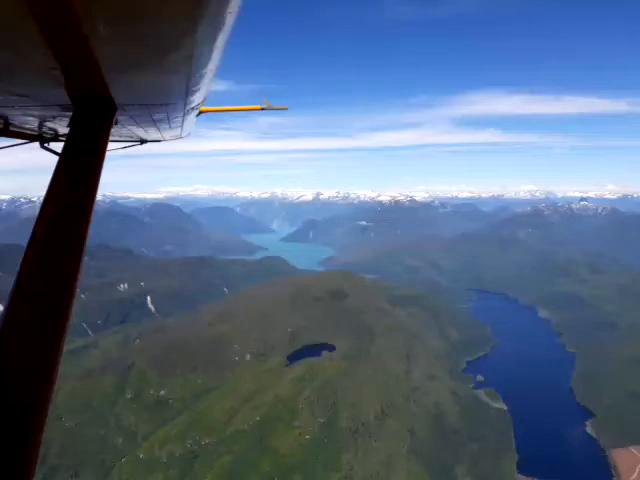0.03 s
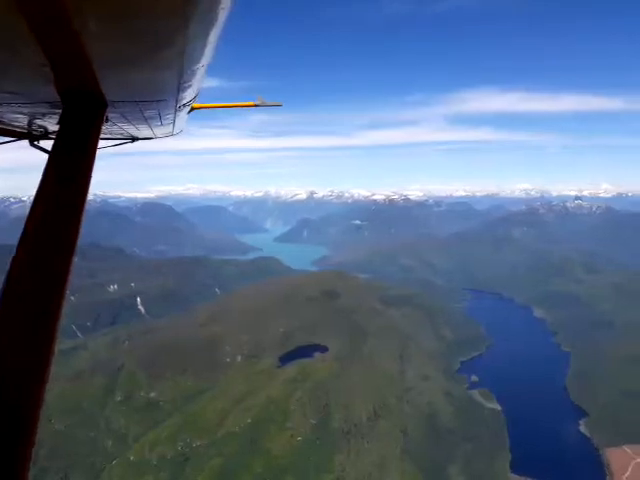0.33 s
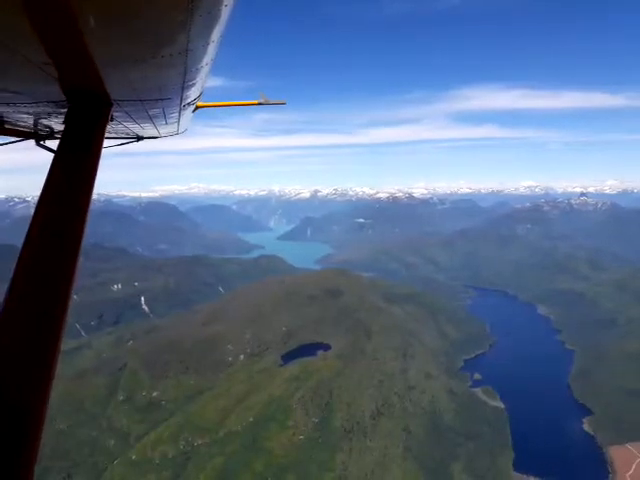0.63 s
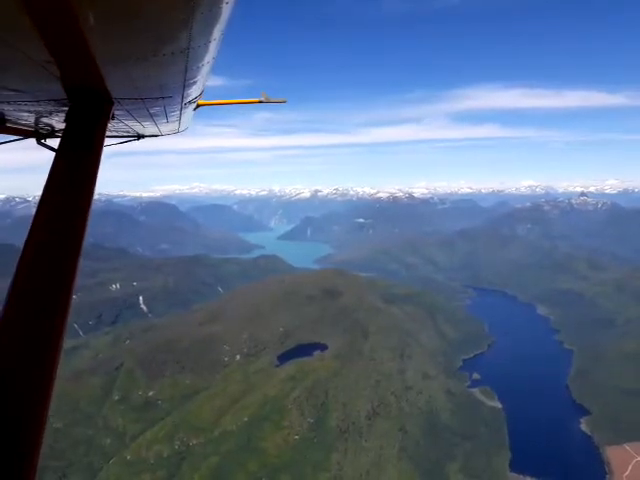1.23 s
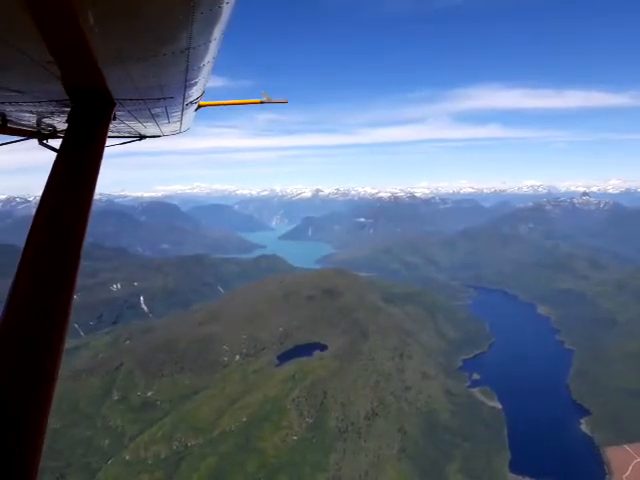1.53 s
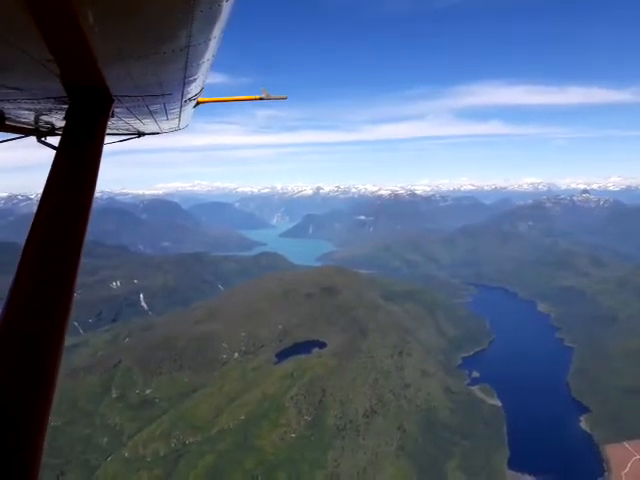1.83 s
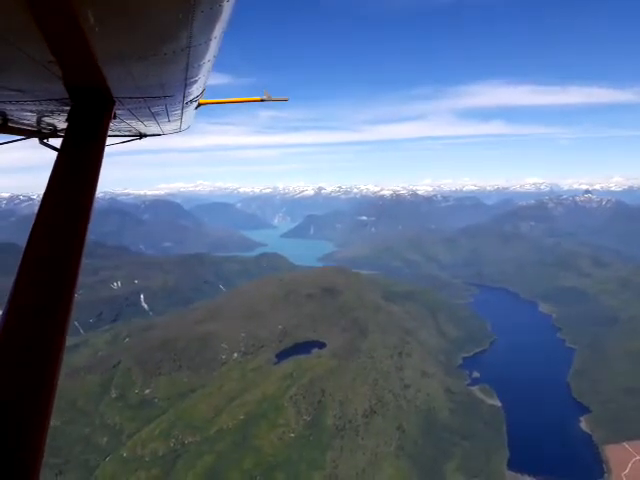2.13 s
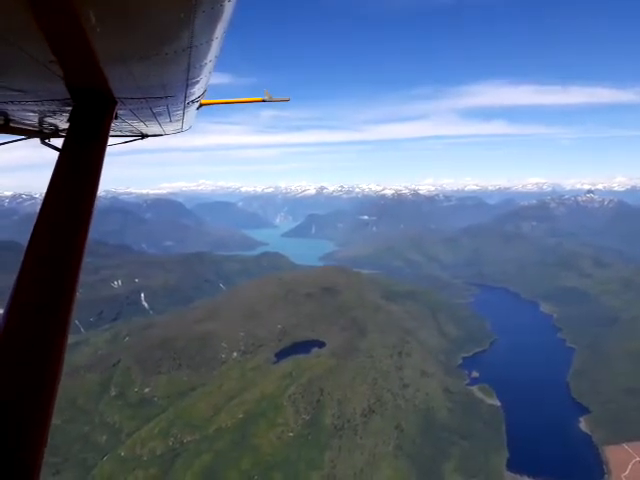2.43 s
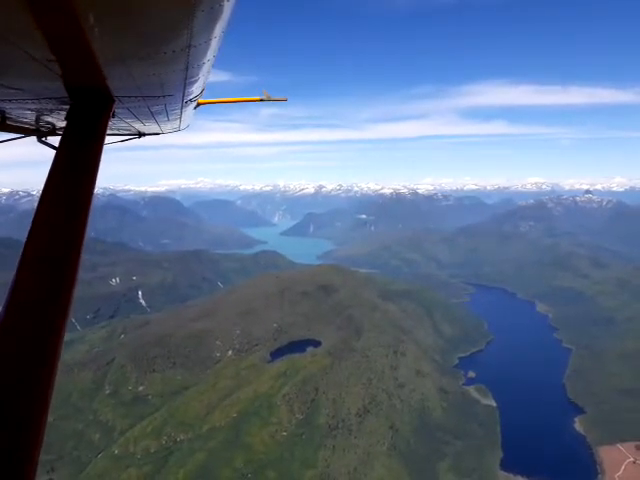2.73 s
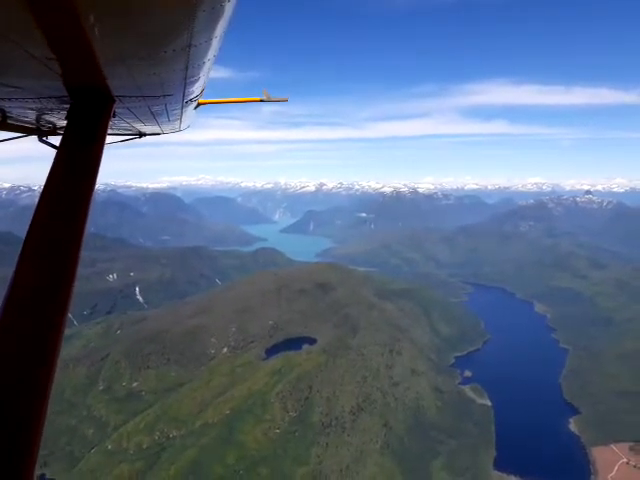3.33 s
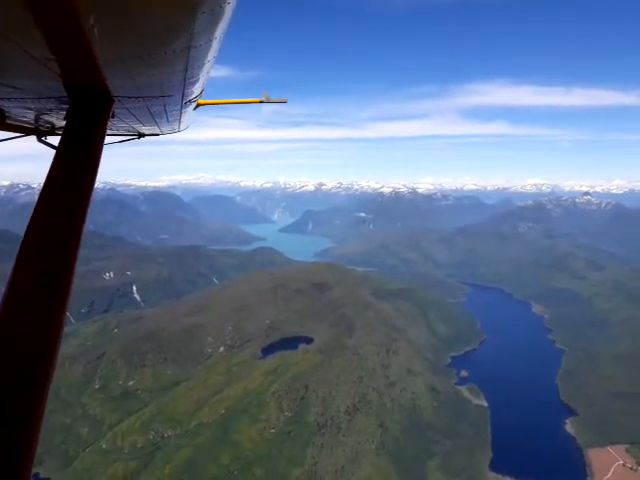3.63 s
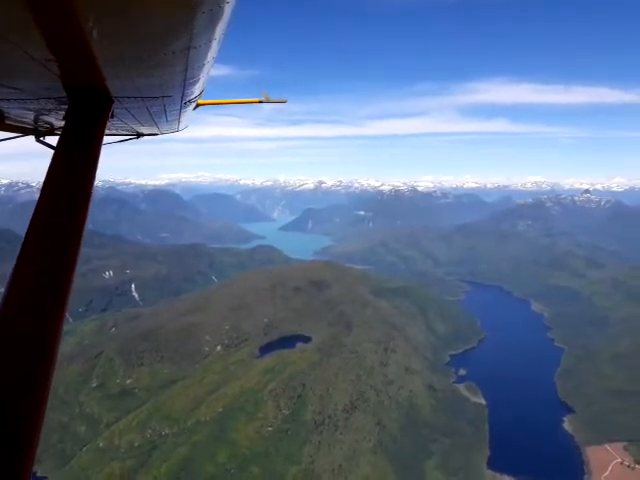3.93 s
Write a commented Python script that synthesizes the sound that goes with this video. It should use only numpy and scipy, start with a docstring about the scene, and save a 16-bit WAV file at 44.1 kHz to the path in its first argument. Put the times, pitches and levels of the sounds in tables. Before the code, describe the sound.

A small propeller plane's engine drone fades in at about 0.4 seconds, after silence, and is fully loud by 0.7 seconds. Heard inside the cabin, it holds a low, booming pitch with a slight warble until the end at about 4 seconds. Air rushes steadily past underneath. Throughout, the din overloads the microphone, making a fluttering crackle of irregular snaps and ticks, mostly on the left.

```python
"""A piston engine's drone fades in, heard inside a small propeller aircraft in level flight.
Its eleventh order booms in the cabin while the slipstream rushes past.
The din overloads the camera, whose signal flips to the opposite rail at the crests:
a fluttering crackle of snaps and ticks, mostly on the left."""
import sys
import numpy as np
from scipy.fft import rfft, irfft, next_fast_len
from scipy.io import wavfile
from scipy.ndimage import map_coordinates

SR = 44100
rng = np.random.default_rng(int(sys.argv[2]) if len(sys.argv) > 2 else 0)


def put_to_file(sound):
    """Save the sound as 16-bit audio at rate SR, in the file named by the first command-line argument."""
    columns = np.atleast_2d(sound).T  # one column per channel
    safe = np.clip(columns, -1, 1)
    whole_steps = np.round(safe * 32767)
    wavfile.write(sys.argv[1], SR, whole_steps.astype(np.int16))


N = 176400

CYCLE_HZ = 15.4607  # one engine cycle = two revolutions
RAIL = 0.86  # overload limit, linear


def engine():
    """Orders of a steady engine; the airframe delays the higher ones, smearing each cycle into a warble."""
    # engine orders: (multiple of the cycle rate, level [dB])
    orders = [(4, -40), (5, -36.5), (6, -32), (7, -28), (8, -32.5), (9, -22.5), (10, -23.5), (11, -10),
              (12, -20), (13, -37.5), (14, -36), (15, -33), (16, -39), (17, -35.5), (18, -27.5),
              (20, -35.5), (22, -32.5), (23, -37.5), (24, -42), (25, -28), (26, -46.5), (30, -33.5),
              (32, -40), (33, -37), (35, -47.5), (36, -35.5), (38, -49.5)]
    sag_hz_per_s, cycle_start_s, smear_rad = .00471, .0423, 1.33
    level_db, pan_db, flutter_db, flutter_hz = -0.5, 0.74, 1, 7.2
    t = np.arange(N) / SR
    phase = 2 * np.pi * (CYCLE_HZ * (t - cycle_start_s) - sag_hz_per_s * t ** 2 / 2)
    drone = np.zeros(N)
    for order, db in orders:
        gain = amp(db + flutter_db * wobble(flutter_hz))
        drone += gain * np.cos(order * phase + smear_rad * order ** 2)
    return np.sqrt(2) * drone * amp(level_db + pan_db * np.array([[1], [-1]]))


def snaps(x):
    """Strong overloads: a crest surges and flips to the opposite rail, chattering on the left."""
    # overloads: (time [s], nominal flipped time left [ms], same right [ms], flips on the left)
    overloads = [(0.445, 0.1, 0.027, 3), (0.448, 0.13, 0, 1), (0.515, 0.41, 0.023, 2),
                 (0.518, 0.073, 0.0, 2), (0.604, 0.23, 0.01, 5), (0.639, 0.35, 0.0, 2),
                 (0.646, 0.36, 0.0, 1), (0.677, 0.13, 0.0, 2), (0.76, 0.18, 0.031, 2),
                 (0.768, 0.27, 0.02, 1), (0.797, 0.27, 0.0, 3), (0.832, 0.17, 0.0, 4),
                 (0.838, 0.28, 0.026, 1), (0.895, 0.25, 0.0, 2), (0.897, 0.35, 0.0, 3),
                 (0.902, 0.36, 0.036, 4), (0.963, 0.53, 0.0, 1), (1.019, 0.42, 0.058, 4),
                 (1.028, 0.094, 0.0, 3), (1.074, 0.24, 0.0, 1), (1.098, 0.099, 0.0, 4),
                 (1.156, 0.56, 0.01, 2), (1.259, 0.13, 0.04, 3), (1.262, 0.16, 0.0, 4),
                 (1.287, 0.53, 0.057, 3), (1.29, 0.35, 0.18, 2), (1.356, 0.39, 0.02, 2),
                 (1.415, 0.13, 0.017, 5), (1.42, 0.38, 0.027, 3), (1.437, 0.23, 0.0, 1),
                 (1.485, 0.31, 0.0092, 6), (1.52, 0.37, 0.0, 3), (1.544, 0.1, 0.0068, 2),
                 (1.55, 0.23, 0, 1), (1.609, 0.21, 0.062, 2), (1.612, 0.09, 0.0, 3),
                 (1.675, 0.36, 0.012, 1), (1.678, 0.52, 0.0, 3), (1.715, 0.63, 0.11, 1),
                 (1.732, 0.09, 0.044, 2), (1.738, 0.23, 0.035, 2), (1.744, 0.17, 0.0, 3),
                 (1.803, 0.55, 0.012, 1), (1.832, 0.31, 0.012, 4), (1.845, 0.18, 0.0, 5),
                 (1.868, 0.4, 0.0, 2), (1.873, 0.18, 0.0, 1), (1.934, 0.9, 0.8, 3), (1.939, 0.39, 0.02, 3),
                 (1.98, 0.16, 0.0, 1), (2.06, 0.56, 0.0, 4), (2.103, 0.11, 0.0, 1), (2.128, 0.35, 0.045, 4),
                 (2.197, 0.28, 0.0, 1), (2.256, 0.48, 0.0, 4), (2.35, 0.48, 0.0, 3), (2.386, 0.32, 0.17, 5),
                 (2.392, 0.17, 0.015, 1), (2.427, 0.14, 0.0, 1), (2.45, 0.64, 0.28, 1),
                 (2.494, 0.52, 0.0, 1), (2.511, 0.16, 0.07, 2), (2.519, 0.28, 0.0, 2),
                 (2.539, 0.13, 0.0, 2), (2.578, 0.22, 0.0, 2), (2.583, 0.19, 0.0, 3),
                 (2.683, 0.41, 0.061, 5), (2.686, 0.2, 0.0, 2), (2.752, 0.18, 0.0, 1),
                 (2.773, 0.41, 0.0, 3), (2.868, 0.2, 0.014, 1), (2.902, 0.16, 0.0062, 1),
                 (2.944, 0.1, 0.003, 2), (2.965, 0.29, 0.03, 1), (2.968, 0.21, 0.0, 3),
                 (2.974, 0.61, 0.35, 3), (3.033, 0.21, 0.0, 1), (3.037, 0.058, 0.059, 3),
                 (3.139, 0.13, 0.02, 4), (3.224, 0.25, 0.021, 3), (3.227, 0.24, 0.012, 4),
                 (3.237, 0.18, 0.0, 1), (3.292, 0.39, 0, 2), (3.321, 0.29, 0.0, 3),
                 (3.324, 0.13, 0.0088, 4), (3.359, 0.27, 0.0, 1), (3.363, 0.2, 0.0, 1),
                 (3.421, 0.54, 0.0, 3), (3.428, 0.5, 0.017, 2), (3.515, 0.2, 0.01, 1),
                 (3.551, 0.24, 0.0, 1), (3.561, 0.28, 0.017, 4), (3.574, 0.34, 0.0, 5),
                 (3.623, 0.71, 0.23, 1), (3.675, 0.088, 0.05, 2), (3.746, 0.74, 0.0, 2),
                 (3.783, 0.2, 0.029, 2), (3.816, 0.62, 0.22, 4), (3.853, 0.49, 0.0, 3),
                 (3.874, 0.6, 0.37, 3), (3.907, 0.13, 0.0, 1), (3.936, 0.12, 0.0, 1), (3.938, 0.19, 0.0, 5),
                 (3.981, 0.15, 0.0, 1)]
    surge_share, surge_s = .7, .0009  # share of the way to the rail, half-width
    pause_s, hold_ms = .0001, 0.18
    reach = int(.0008 * SR)
    y = x.copy()
    for time_s, left_ms, right_ms, count in overloads:
        scatter = rng.standard_normal((2, 8))
        first = int(time_s * SR) - reach
        crest = first + np.argmax(np.abs(x[0, first:first + 2 * reach]))
        rail = np.sign(x[0, crest]) * RAIL
        gap_s = pause_s / (1 + (right_ms / hold_ms) ** 2)  # long holds merge into one knock
        gates = flip_burst(left_ms, count, gap_s, scatter), flip_burst(right_ms, 1, gap_s, scatter)
        offsets = np.arange(len(gates[0])) - len(gates[0]) // 2
        at = np.clip(crest + offsets, 0, N - 1)
        surge = surge_share * (rail - x[0, crest]) * np.exp(-(offsets / SR / surge_s) ** 2)
        for side, gate in zip(y, gates):
            side[at] = (side[at] + surge * gate.max()) * (1 - gate) - rail * gate
    return y


def flip_burst(nominal_ms, count, gap_s, scatter):
    """Share (0-1) of each sample spent flipped: count uneven flips with short pauses between."""
    stretch, length_spread, gap_spread = 1.08, 1.35, 1.05
    weights = np.exp(length_spread * scatter[0, :count])
    lengths = stretch * nominal_ms * SR / 1000 * weights / weights.sum()
    gaps = gap_s * SR * np.exp(gap_spread * np.clip(scatter[1, :count], -2, 2))
    ends = np.cumsum(lengths + gaps)
    ends -= (ends[-1] + ends[0] - lengths[0]) / 2  # centre on the crest
    offsets = np.arange(-SR // 400, SR // 400)[:, None]
    overlap = np.minimum(offsets + 1, ends) - np.maximum(offsets, ends - lengths)
    return np.clip(overlap, 0, 1).sum(1)


def ticks(x, per_s):
    """Brief partial flips, in clumps, likelier on wide swings of the wave and once a revolution."""
    clump_db, clump_hz, swing_db, peak_s = 7, 200, 6.5, .022
    flip_share, spread, tick_s = 0.49, 0.34, .00005
    swing = np.cos(4 * np.pi * CYCLE_HZ * (np.arange(N) / SR - peak_s))
    chance = x ** 2 * amp(clump_db * wobble(clump_hz) + swing_db * swing)
    struck = rng.random(N) < per_s / SR * chance / chance.mean()
    depth = flip_share * np.exp(spread * rng.standard_normal(N))
    pulse = np.ones(round(tick_s * SR))
    gate = np.clip(np.convolve(struck * depth, pulse, "same"), 0, 1)
    return x * (1 - gate) - np.sign(x) * RAIL * gate


def slipstream():
    """Air rushing along the cabin: shared in the bass, separate and brighter on the left in the treble."""
    # air noise spectrum per side: (frequency [Hz], density [dB per Hz])
    air_left = [(20, -64), (60, -52), (170, -42), (300, -49), (540, -48), (1000, -55), (1700, -58.5),
                (3000, -66), (4600, -72), (7400, -66.5), (8200, -78), (15500, -79.5)]
    air_right = [(20, -74), (60, -49.5), (170, -45), (300, -51), (540, -53), (1000, -61.5), (1900, -61.5),
                 (3000, -68.5), (4600, -72.5), (7400, -78.5), (8200, -77.5), (15500, -86)]
    # left-right likeness: (frequency [Hz], correlation)
    likeness = [(30, 1), (170, .92), (600, .8), (1000, -0.18), (1400, -0.27), (2000, -.1), (4000, 0.073)]
    level_db, flutter_db, flutter_hz = 0.5, 1.2, 25

    def mid_side_gains(hz):
        angle = np.arccos(along(likeness, hz)) / 2
        return np.array([np.cos(angle), np.sin(angle)])

    mid, side = filtered(rng.standard_normal((2, N)), mid_side_gains)
    stereo = np.array([mid + side, mid - side])
    air = filtered(stereo, lambda hz: amp([along(air_left, hz), along(air_right, hz)]))
    return np.sqrt(SR / 2) * air * amp(level_db + flutter_db * wobble(flutter_hz))


def amp(db):
    """Decibels to gain."""
    return 10 ** (np.asarray(db) / 20)


def along(points, hz):
    """Interpolate (Hz, value) points on a log frequency axis."""
    point_hz, values = np.transpose(points)
    return np.interp(np.log(hz + 1), np.log(point_hz + 1), values)


def wobble(rate_hz):
    """Smooth random curve, rate_hz knots a second."""
    knots = rng.standard_normal(int(N * rate_hz / SR) + 4)
    return map_coordinates(knots, [np.arange(N) * rate_hz / SR])


def filtered(x, response):
    """Filter x by the gain response(hz)."""
    size = next_fast_len(N + SR // 2)
    return irfft(rfft(x, size) * response(np.fft.rfftfreq(size, 1 / SR)), size)[..., :N]


def scene():
    """Engine and airflow in the cabin."""
    return engine() + slipstream()


def record(dry):
    """Overload, band limit and fade-in."""
    fade_from_s, fade_to_s, mute_until_s, top_hz = 0.4, 0.69, .417, 16100
    t = np.arange(N) / SR
    fade = np.clip((t - fade_from_s) / (fade_to_s - fade_from_s), 0, 1) * (t > mute_until_s)
    left, right = snaps(np.clip(dry, -RAIL, RAIL))
    crackling = np.array([ticks(left, per_s=135), ticks(right, per_s=7)])
    return fade * filtered(crackling, lambda hz: hz < top_hz)


dry = scene()
out = record(dry)
put_to_file(out)
```